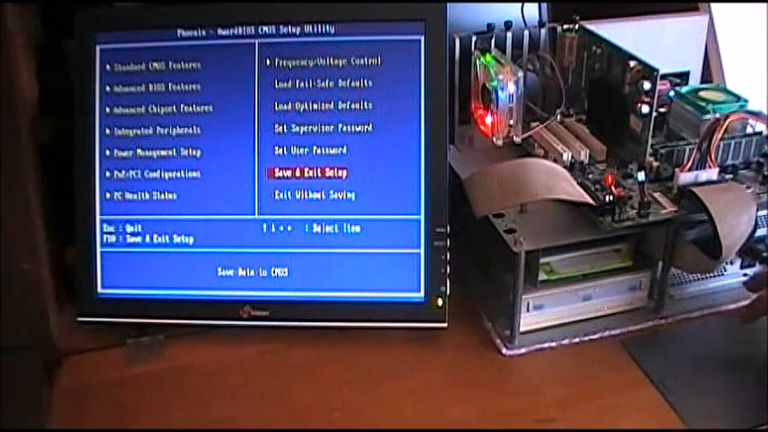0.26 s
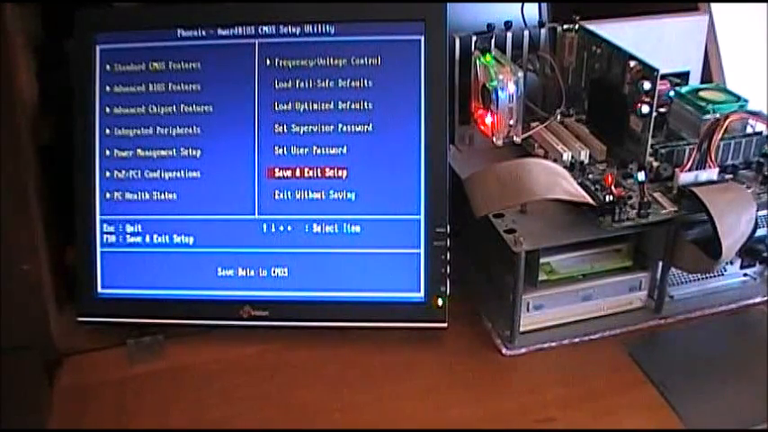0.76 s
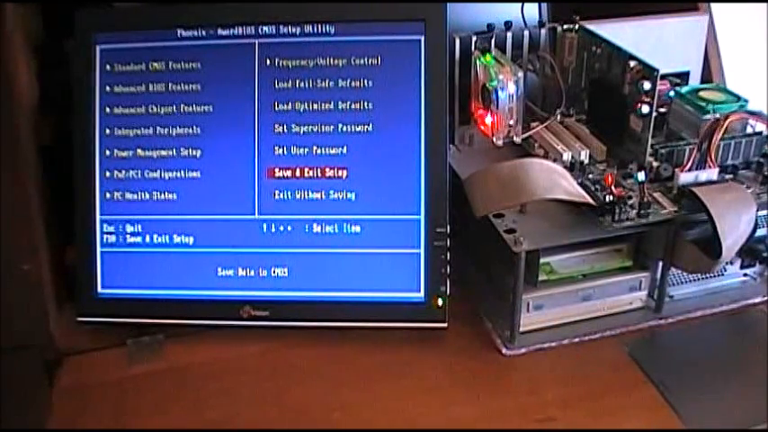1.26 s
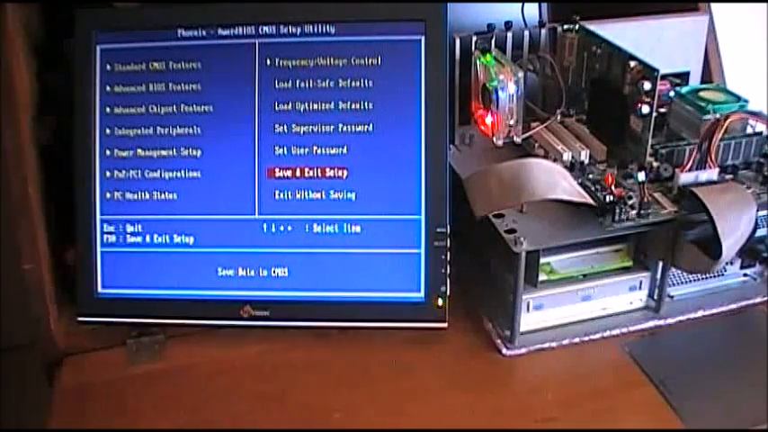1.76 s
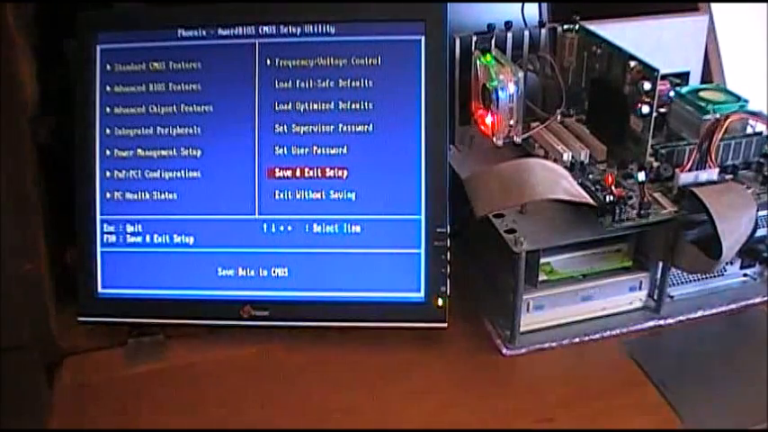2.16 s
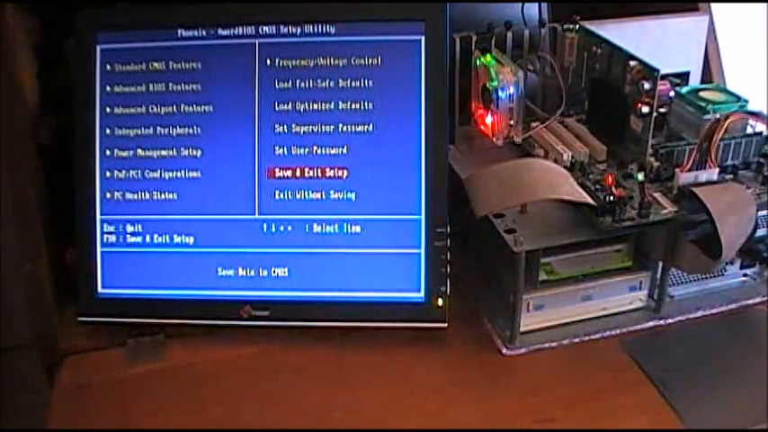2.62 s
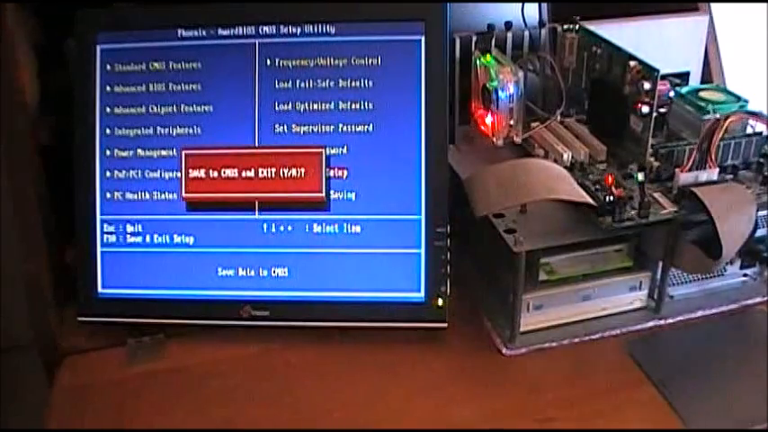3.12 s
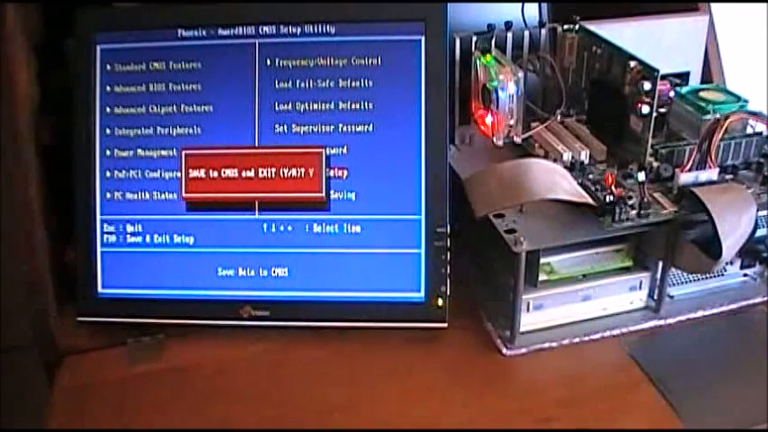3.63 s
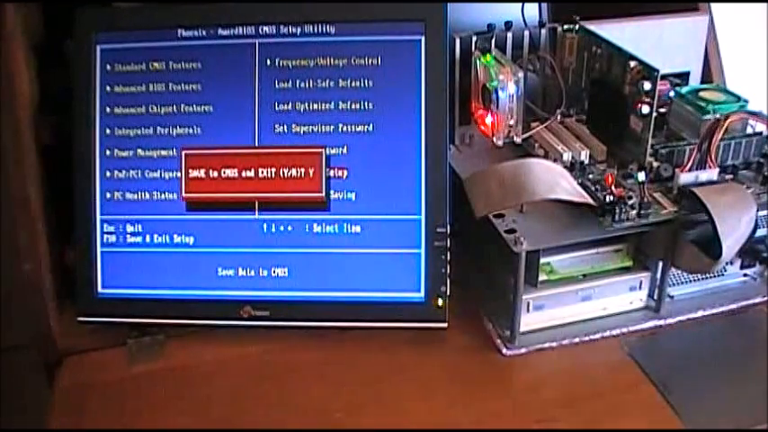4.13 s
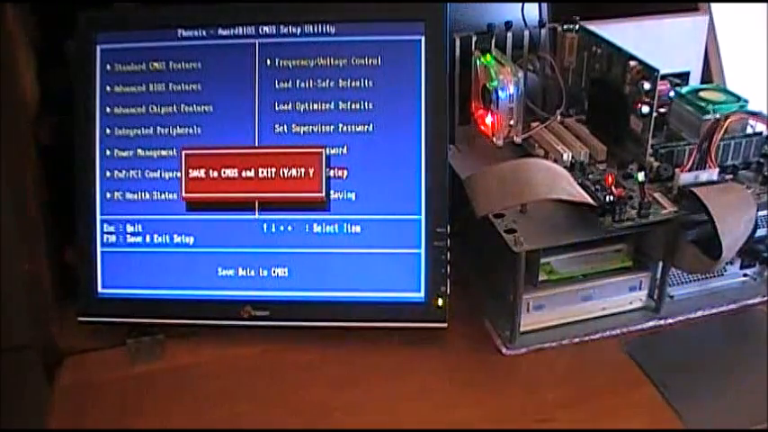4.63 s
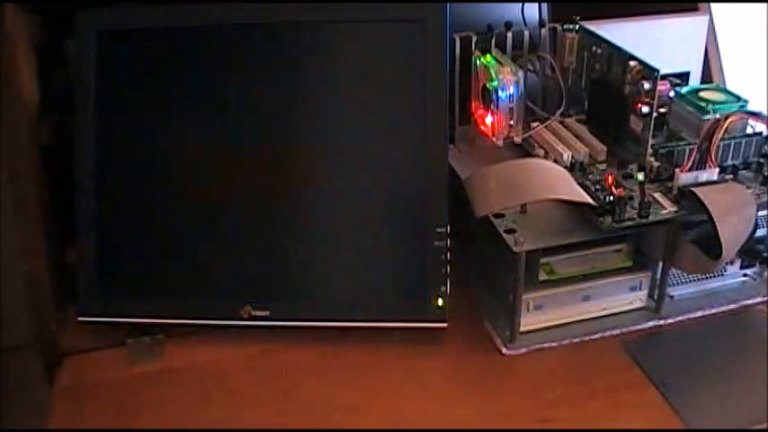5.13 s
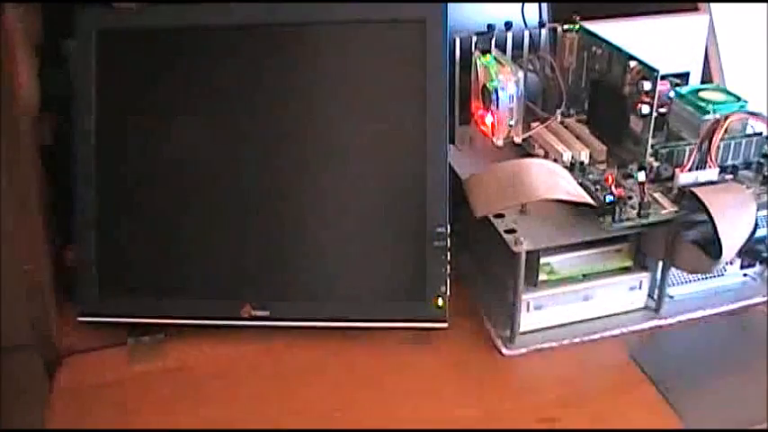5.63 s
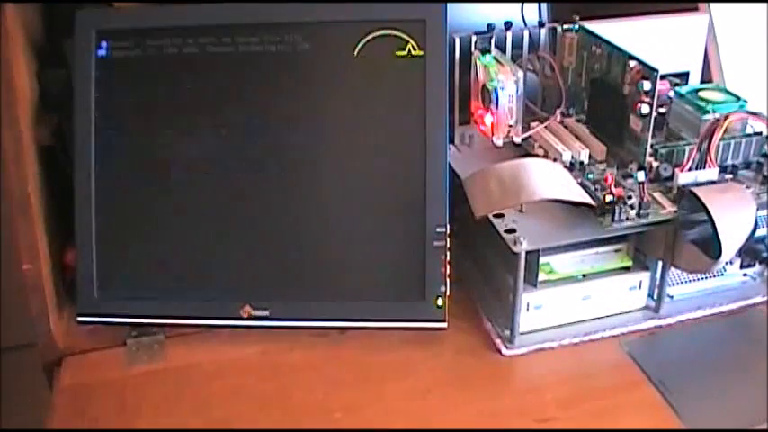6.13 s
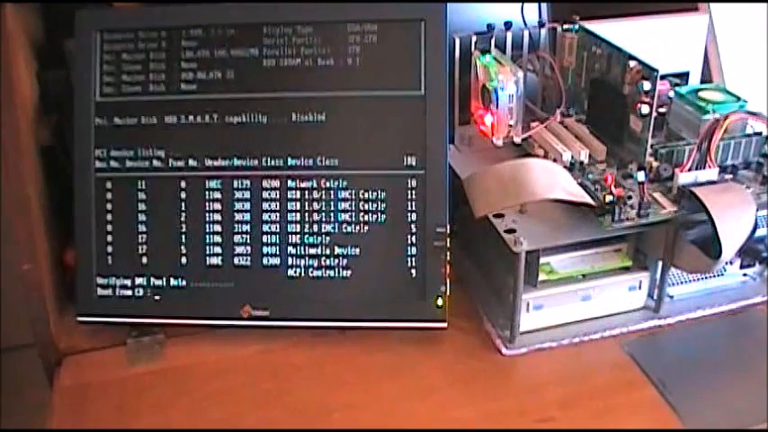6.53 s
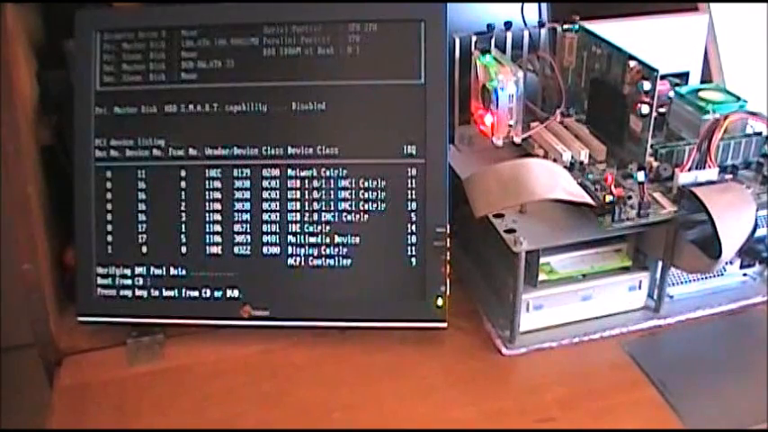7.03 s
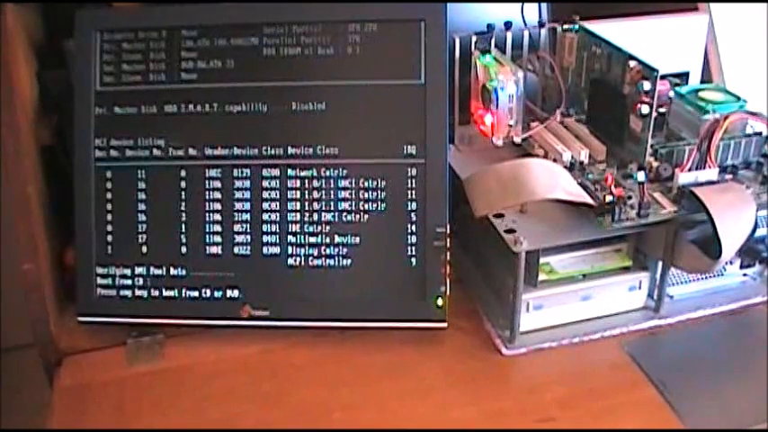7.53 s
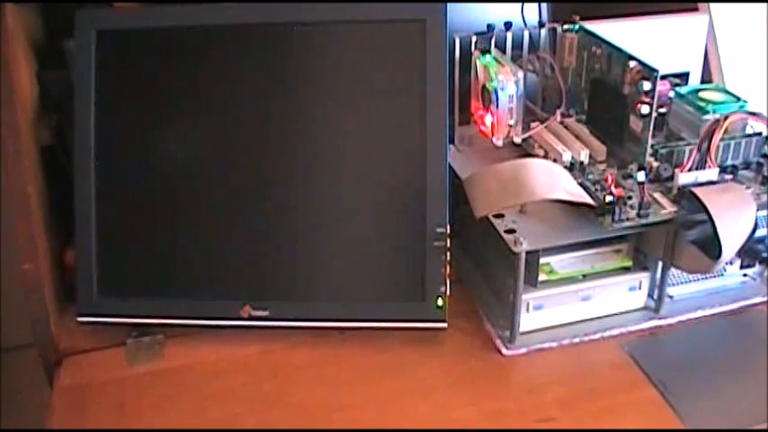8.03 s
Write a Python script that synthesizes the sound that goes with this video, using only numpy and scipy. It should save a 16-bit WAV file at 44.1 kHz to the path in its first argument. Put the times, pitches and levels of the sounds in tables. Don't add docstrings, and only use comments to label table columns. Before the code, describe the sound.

Small fans in an open computer whir throughout, a rushing airy noise with a thin, slightly wavering whine. At first a keyboard is shifted on a wooden bench, with plastic taps, soft knocks and a brief drag. More taps follow, then three widely spaced, hard key clacks. Sound drops out completely for an instant twice. Close stereo pickup in a small room, fans a little to the left.

```python
import sys
import numpy as np
from scipy import signal
from scipy.fft import rfft, irfft, next_fast_len
from scipy.io import wavfile
from scipy.ndimage import uniform_filter1d

SR = 44100
rng = np.random.default_rng(int(sys.argv[2]) if len(sys.argv) > 2 else 0)


def magnitude_from_level(level_db):
    exponent = np.asarray(level_db, float) / 20
    return 10 ** exponent


def generate_wav(signal):
    frames = np.transpose(np.atleast_2d(signal))
    scaled = np.clip(frames, -1, 1) * 32767
    pcm = np.round(scaled).astype(np.int16)
    wavfile.write(sys.argv[1], SR, pcm)


N = 364707

# hz, left_minus_right_db
TILT = [(60, 1.5), (110, 1.2), (190, 1.4), (340, 1), (600, 6.4), (1060, 7.2), (1880, 4.6), (3340, 2.7),
        (5940, 1.0), (10500, 2.8)]
# hz, left_leads_rad
LEAD = [(30, 0.7), (950, -0.036), (2600, -0.46), (4650, -0.31), (5700, 0), (7700, 0.03), (9500, -0.19)]


def on_log(hz, table):
    f, v = np.transpose(table)
    return np.interp(np.log(np.maximum(hz, 1)), np.log(f), v)


def walk(rate_hz):
    k = int(SR / rate_hz)
    held = np.repeat(rng.standard_normal(N // k + 1), k)
    return 1.314 * uniform_filter1d(uniform_filter1d(held, k), k)[:N]


def highpass(order, hz, x):
    return signal.sosfilt(signal.butter(order, hz, "high", fs=SR, output="sos"), x)


def fade(t60_s, length_s):
    return np.exp(-np.log(1000) * np.arange(int(length_s * SR)) / SR / max(t60_s, .002))


def body(modes):
    t = np.arange(int(.25 * SR)) / SR
    ring = 0
    for k, (hz, db, t60_s) in enumerate(modes):
        ring = ring + (-1) ** k * magnitude_from_level(db) * fade(t60_s, .25) * np.sin(2 * np.pi * hz * t)
    return ring


def strike(modes, push, peak_db):
    ring = signal.fftconvolve(push, body(modes))
    return ring * magnitude_from_level(peak_db) / np.abs(ring).max()


def add(track, start_s, sound, pan_db):
    i = int(start_s * SR)
    track[:, i:i + len(sound)] += np.outer(magnitude_from_level([pan_db / 2, -pan_db / 2]), sound)


def gestures(t, rows, rise_db_s, fall_db_s):
    gain = 0
    for start_s, length_s, db in rows:
        before_s = np.maximum(start_s - t, 0)
        after_s = np.maximum(t - start_s - length_s, 0)
        gain = gain + magnitude_from_level(db - rise_db_s * before_s - fall_db_s * after_s)
    return gain


def rush():
    # hz, db_per_hz
    air = [(18, -88.5), (30, -30.5), (257, -14.5), (327, -12), (560, -12.5), (648, -13), (769, -14.5),
           (827, -8.5), (890, -11.5), (1350, -7.5), (2420, -11.5), (3490, -12.5), (4340, -18.5),
           (8390, -19), (10200, -27), (13300, -69), (22000, -120)]
    # hz, width_hz, level_db
    cabinet = [(1540, 50, 3.1), (1660, 680, 2), (3670, 420, 2), (340, 20, 1.1), (91.5, 5.9, 7),
               (650, 40, 4.5), (2150, 200, 2.2)]
    # hz, likeness (-1..1)
    likeness = [(60, -.2), (130, -.4), (260, .25), (550, .3), (1150, .77), (2400, .76), (5000, .74),
                (10500, .62)]
    rush_db = -48 - 1.44
    size = next_fast_len(N)
    hz = np.fft.rfftfreq(size, 1 / SR)
    shape_db = on_log(hz, air)
    for f, width_hz, db in cabinet:
        shape_db = shape_db + db / (1 + ((hz - f) / width_hz * 2) ** 2)
    alike = np.clip(on_log(hz, likeness), -.95, .95)
    one, other = rfft(rng.standard_normal((2, size)))
    side = magnitude_from_level(on_log(hz, TILT) / 2) * np.exp(.5j * on_log(hz, LEAD))
    left = one * side
    right = (alike * one + np.sqrt(1 - alike ** 2) * other) / side
    pair = magnitude_from_level(shape_db) * np.array([left, right])
    out, swell = 0, walk(1.5)
    half_octaves = 2 * np.log2(np.maximum(hz, 1) / 25)
    for band in range(19):
        share = np.clip(1 - np.abs(half_octaves - band), 0, 1)
        gain = magnitude_from_level(0.4 * swell + 0.47 * walk(12.))
        out = out + gain * irfft(pair * share, size)[:, :N]
    return out * magnitude_from_level(rush_db) / np.sqrt(np.mean(out.mean(0) ** 2))


def tone(hz, rms_db, wobble_db):
    turn = 2 * np.pi * (np.cumsum(hz) / SR + rng.random())
    pan_db = on_log(np.mean(hz), TILT)
    lead_rad = on_log(np.mean(hz), LEAD) + .3 * rng.standard_normal()
    wave = np.sin(turn + np.array([[lead_rad], [0]])) * magnitude_from_level([[pan_db / 2], [-pan_db / 2]])
    return np.sqrt(2) * magnitude_from_level(rms_db + wobble_db * walk(6.)) * wave


def rotors(t):
    # time_s, blade_rate_hz, rms_db
    fast_rotor = [(0, 839, -57), (1.2, 860.4, -61), (1.8, 849.5, -70.5), (2.37, 848, -57.5),
                  (2.6, 849, -67.5), (3.4, 844, -57), (3.7, 844, -68), (4.15, 848.5, -63.5),
                  (4.55, 849, -64), (4.8, 848, -59.5), (5.6, 848.6, -61), (5.9, 843.5, -54.5),
                  (6.3, 845.4, -62), (6.77, 843.5, -56.5), (7.1, 843.5, -60), (7.67, 845, -56),
                  (8.3, 846, -59)]
    # multiple, rms_db
    fast_overtones = [(2, -65), (3, -67.5), (4, -69)]
    # multiple, rms_db
    slow_orders = [(1, -68.5), (2, -68.5), (3, -68), (4, -63)]
    # hz, rms_db
    other_tones = [(921, -73.5), (1130, -67), (1384, -62.5), (2164, -70.5), (2988, -92.5), (5647, -74.5),
                   (6234, -86)]
    time_s, rate_hz, fast_db = np.transpose(fast_rotor)
    fast_hz = np.interp(t, time_s, rate_hz) * (1 + 0.000593 * walk(3.))
    slow_hz = 329.9 * (1 + 0.000947 * walk(2.98))
    out = tone(fast_hz, np.interp(t, time_s, fast_db), 0.92)
    out += sum(tone(k * fast_hz, db, 0.86) for k, db in fast_overtones)
    out += sum(tone(k * slow_hz, db, 1.0) for k, db in slow_orders)
    out += sum(tone(hz * (1 + 0.002027 * walk(7.)), db, 1.1) for hz, db in other_tones)
    return out


def strokes():
    # start_s, peak_db, cap_hz, bounce_db (against landing)
    presses = [
        (2.8359, -18.5, 2060, -8.5),
        (5.044, -17.5, 2170, -9),
        (7.068, -15, 2500, -2.5),
    ]
    # start_s, peak_db
    releases = [
        (2.905, -34),
        (5.121, -31),
        (7.109, -32),
    ]
    # late_s, clack_db, thud_db, snap_db (against peak), pitch_share
    landing = [
        (-.004, -4.5, -20.5, -14.5, 1.152),
        (0, -1, -13, 2, 1.016),
        (.003, -5, -23, -8, 1.07),
    ]
    bounces = [
        (.009, 2, -28, -8, 0.877),
        (.017, -3.5, -26, -2, 1.03),
        (.024, -13.5, -29, -8.5, 1.05),
        (.031, -9, -29, -14, .95),
    ]
    spring_back = [
        (0, 0, -9, -2.5, 1.017),
        (.017, -6.5, -29, -9, 1.05),
    ]
    thud_db_per_octave, snap_db_per_octave = -29.5, -18.5
    rows = []
    for (down_s, peak_db, hz, bounce_db), (up_s, up_db) in zip(presses, releases):
        octaves = np.log2(hz / 2000)
        stages = ((landing, down_s, peak_db), (bounces, down_s, peak_db + bounce_db),
                  (spring_back, up_s, up_db))
        for stage, start_s, stage_db in stages:
            for late_s, clack, thud, snap, share in stage:
                clack_db = stage_db + clack
                thud_db = stage_db + thud + thud_db_per_octave * octaves
                snap_db = stage_db + snap + snap_db_per_octave * octaves
                t60_s = 0.014 * np.exp(-0.1457 * (clack_db + 20))
                rows.append((start_s + late_s, clack_db, thud_db, snap_db, t60_s, share * hz))
    return rows


def taps():
    # start_s, clack_db, thud_db, snap_db, cap_hz
    touches = [(0, -30, -33, -28.5, 1420), (.006, -26.5, -42, -35, 1930), (.0146, -23, -45, -31, 1200),
               (.021, -29.5, -47, -38, 1830), (.0468, -27, -39.5, -24, 2010), (0.05, -18.5, -48, -27, 1155),
               (.056, -34, -46, -38, 1940), (.1656, -25, -45, -34, 1820), (.182, -35, -43, -58, 1900),
               (.282, -36.5, -38, -58, 1310), (.365, -33.5, -45, -41, 1900), (.695, -39.5, -50, -72, 2150),
               (1.2552, -18.5, -33, -28, 1980), (1.2585, -25.5, -32.5, -37, 2060),
               (1.2975, -24.5, -34.5, -34, 1740), (1.302, -26, -41, -42, 2280),
               (1.309, -39, -34, -48, 1890)]
    rows = []
    for start_s, clack_db, thud_db, snap_db, hz in touches:
        t60_s = 0.016 * np.exp(-0.0433 * (clack_db + 20))
        rows.append((start_s, clack_db, thud_db, snap_db, t60_s, hz))
    return rows


def keys(contacts):
    # pitch_multiple, level_db, t60_s
    cap_modes = [(0.547, -6, 0.0044), (.75, -8, 0.017), (0.919, 3, 0.0059), (1.06, 5, 0.0047),
                 (1.197, -7.5, 0.014), (1.45, -6, 0.0044)]
    # hz, level_db, t60_s
    tray_modes = [(436, -25.5, 0.1), (765, 9, 0.014), (1030, -22, 0.084)]
    # hz, level_db, t60_s
    snap_modes = [(3650, -10.5, .0015), (4560, 0, .0015), (5590, 0, .0015), (6400, 0.5, .0017),
                  (8200, -1, .0017), (9560, -6, .0015)]
    pan_db = 5
    track = np.zeros((2, N))
    grits = rng.standard_normal((len(contacts), 3, 4410))
    for (start_s, clack_db, thud_db, snap_db, t60_s, hz), grit in zip(contacts, grits):
        push = grit * fade(t60_s, .1) * (1 - fade(.0025, .1))
        cap = [(k * hz, db, ring_s) for k, db, ring_s in cap_modes]
        add(track, start_s, strike(cap, push[0], clack_db + 0.25), pan_db)
        add(track, start_s, strike(tray_modes, push[1], thud_db + 1.5), pan_db + 1.5)
        add(track, start_s, strike(snap_modes, push[2], snap_db + 4.5), pan_db - 4.0)
    return np.array([np.roll(track[0], 1), track[1]])


def knocks(t):
    # start_s, peak_db, upper_minus_lower_db
    rocking = [(0.015, -27, -18), (.046, -23.5, -4), (0.098, -36, -2), (.18, -35, 13), (.279, -34, 6.5),
               (.355, -50, -14), (.427, -31, 5), (.455, -30, 5), (.497, -33, 7), (.578, -33, 7),
               (.607, -35, -2), (.691, -33, 0), (.732, -34, 7), (.779, -51, 12), (2.188, -37, -15),
               (4.513, -37.5, -3), (6.02, -40, -5)]
    # hz, level_db, t60_s
    bench_low = [(330, -6, 0.0093), (431, 11.5, 0.029), (546, -9, 0.023)]
    bench_high = [(723, 3.5, 0.044), (615, -6, 0.039), (838, -3.5, 0.069), (1050, -8.5, 0.065)]
    # start_s, length_s, rms_db
    scuffs = [
        (0, .03, -51),
        (0.174, 0.043, -69),
        (0.432, 0.14, -53.5),
        (3.898, .1, -61),
    ]
    track = np.zeros((2, N))
    grits = rng.standard_normal((len(rocking), 2, 1764))
    for (start_s, db, upper_db), grit in zip(rocking, grits):
        push = grit * fade(.025, .04) * (1 - fade(.008, .04))
        add(track, start_s, strike(bench_low, push[0], db - upper_db / 2 - 9.5), 5.)
        add(track, start_s, strike(bench_high, push[1], db + upper_db / 2 - 9.5), 6.)
    stumble = rng.standard_normal(N) * magnitude_from_level(4.1 * walk(40.))
    drag = signal.fftconvolve(stumble, body(bench_low) + 1.3 * body(bench_high))[:N]
    add(track, 0, drag / np.std(drag) * gestures(t, scuffs, rise_db_s=124, fall_db_s=91.5), 5.5)
    return track


def booms():
    # start_s, peak_db, pitch_hz
    blows = [(0.018, -31.5, 334), (0.055, -42.5, 148), (.449, -58, 172), (0.699, -57, 182),
             (1.299, -48, 183), (1.309, -48, 265), (2.19, -39.5, 470), (2.841, -64.5, 130),
             (2.842, -41.5, 410), (5.05, -46, 380), (6.015, -48, 296.3), (7.071, -59, 218.5)]
    decay_cycles = 16
    track = np.zeros((2, N))
    for start_s, db, hz in blows:
        cycles = np.arange(int(2 * SR / hz)) * hz / SR
        push = np.hanning(len(cycles)) * np.sin(2 * np.pi * cycles)
        add(track, start_s, strike([(hz, 0, decay_cycles / hz)], push, db), 5.)
    return track


def brush(t):
    # start_s, length_s, rms_db
    passes = [
        (2.09, 0.27, -59.5),
        (6.02, .23, -56),
    ]
    hiss = highpass(2, 4000, rng.standard_normal(N) + .5 * rng.standard_normal((2, N)))
    return hiss * gestures(t, passes, rise_db_s=252, fall_db_s=500) * magnitude_from_level(2.5 * walk(65.0))


def room(dry):
    t60_s, room_db = 0.18, -1
    shared, own = rng.standard_normal(SR // 2), rng.standard_normal((2, SR // 2))
    grain = 0.88 * shared + 0.53 * own
    dull = signal.sosfilt(signal.butter(1, 3000, fs=SR, output="sos"), grain)
    tail = dull * fade(t60_s, .5) + (grain - dull) * fade(0.76 * t60_s, .5)
    tail[:, :int(.004 * SR)] = 0
    tail /= np.sqrt(np.mean(np.sum(tail ** 2, axis=1)))
    return magnitude_from_level(room_db) * signal.fftconvolve(dry, tail, axes=1)[:, :N]


def scene():
    t = np.arange(N) / SR
    struck = highpass(3, 420, keys(strokes()))
    tapped = highpass(3, 420, keys(taps()))
    near = tapped + highpass(4, 260, knocks(t)) + highpass(2, 60, booms())
    echo = room(magnitude_from_level(-2.5) * near + struck)
    return rush() + rotors(t) + near + struck + echo + brush(t)


def band_limit(x):
    return signal.sosfilt(signal.butter(12, 11140, fs=SR, output="sos"), x)


def record(dry):
    # start_s, end_s, smear_db, fall_out_db_s, fall_in_db_s
    dropouts = [
        (1.5882, 1.6696, -17, 1500, 1300),
        (5.9262, 6.0072, -24, 800, 1500),
    ]
    out = highpass(1, 90, dry)
    out = signal.sosfilt(signal.ellip(14, .3, 60, 10000, fs=SR, output="sos"), out)
    t = np.arange(N) / SR
    for start_s, end_s, smear_db, fall_out, fall_in in dropouts:
        depth_s = np.minimum(t - start_s, end_s - t)
        early = t < (start_s + end_s) / 2
        leak_db = np.where(early, smear_db - fall_out * depth_s, -13 - fall_in * depth_s)
        out = out * np.where(depth_s > 0, magnitude_from_level(leak_db) * (depth_s < .026), 1)
    return band_limit(out)


dry = scene()
out = record(dry)
generate_wav(out)
```